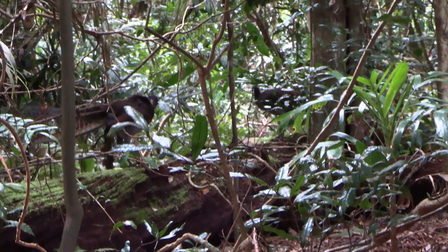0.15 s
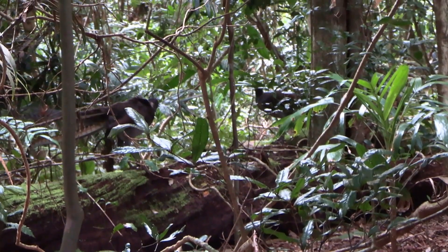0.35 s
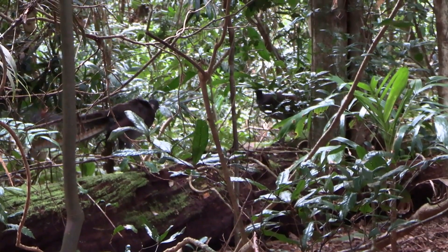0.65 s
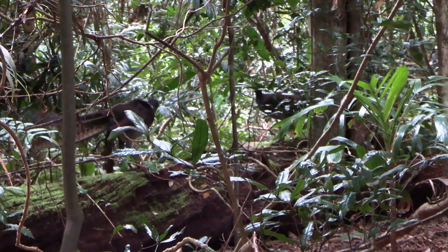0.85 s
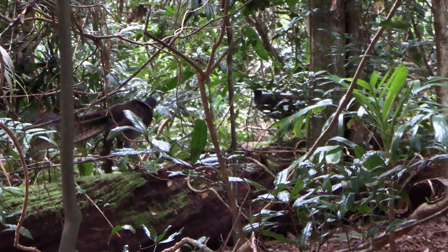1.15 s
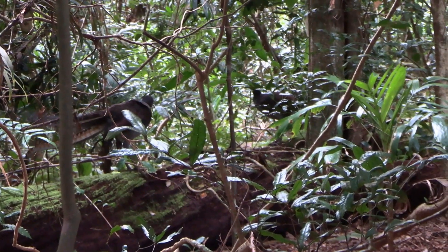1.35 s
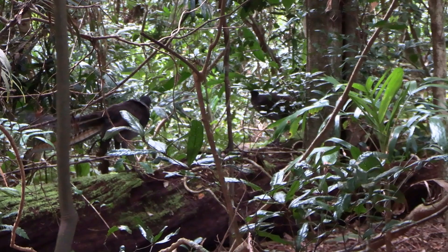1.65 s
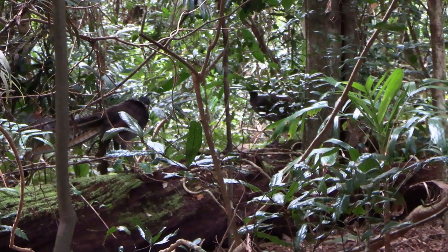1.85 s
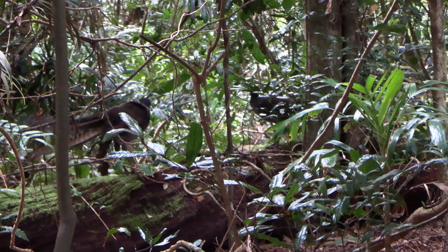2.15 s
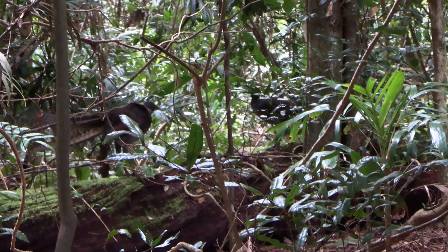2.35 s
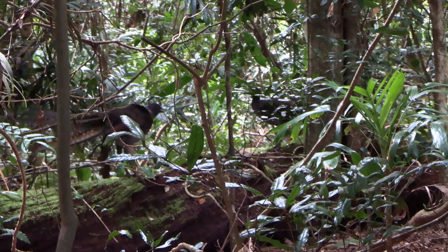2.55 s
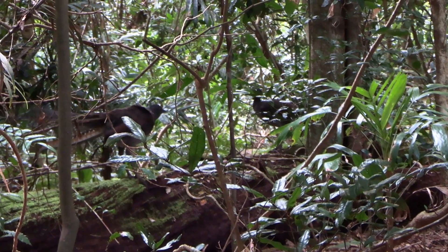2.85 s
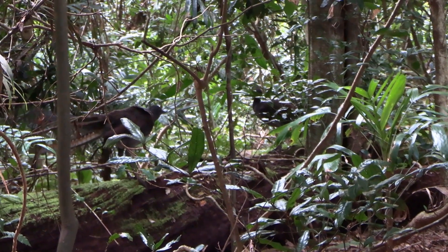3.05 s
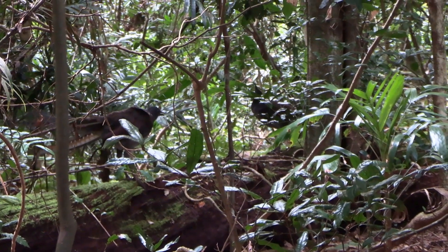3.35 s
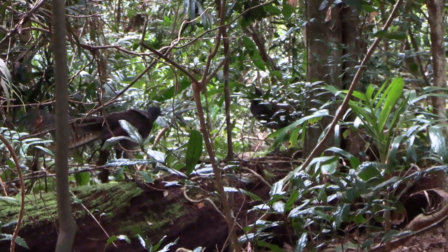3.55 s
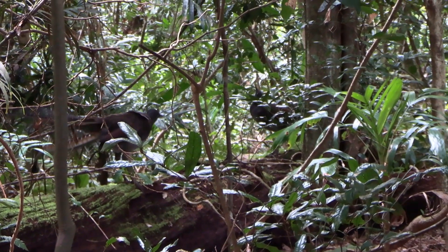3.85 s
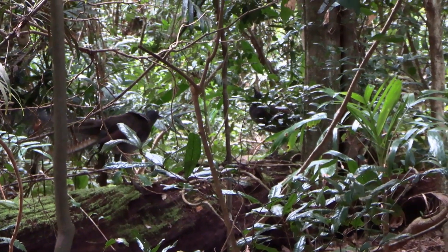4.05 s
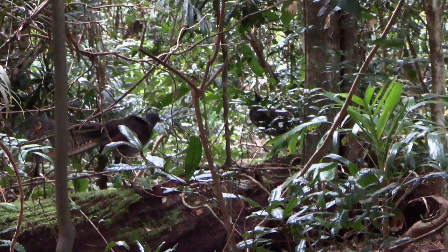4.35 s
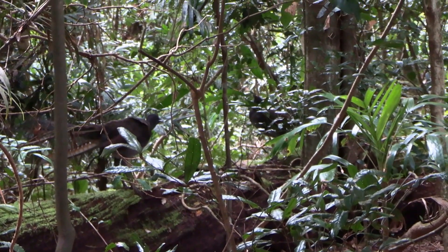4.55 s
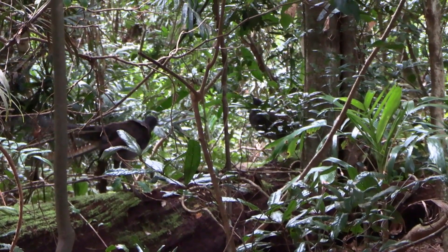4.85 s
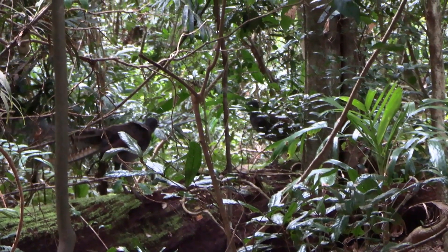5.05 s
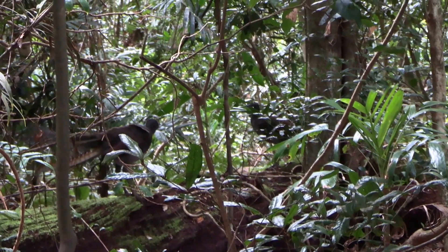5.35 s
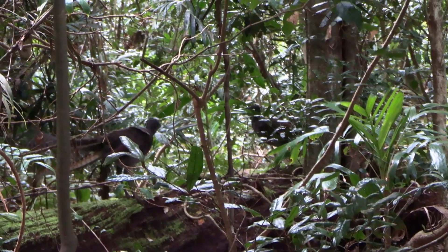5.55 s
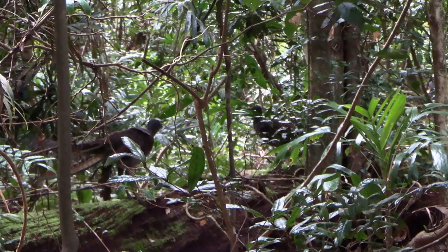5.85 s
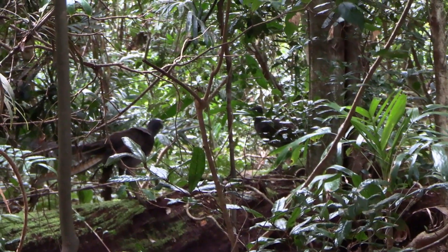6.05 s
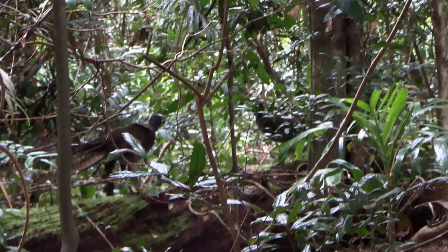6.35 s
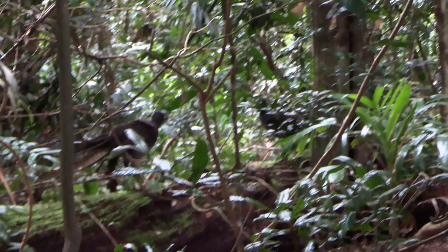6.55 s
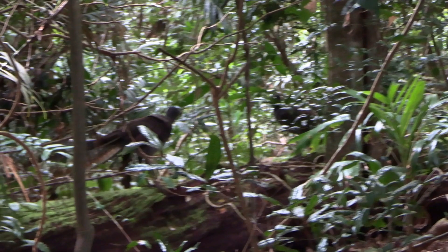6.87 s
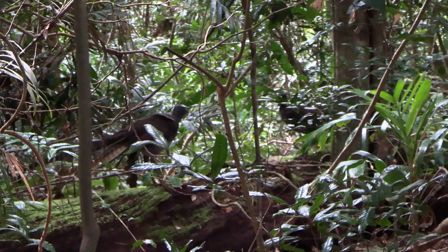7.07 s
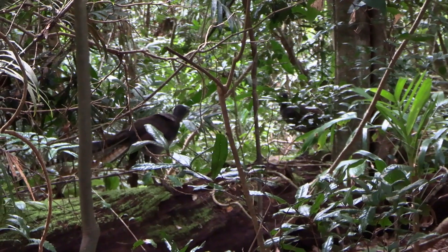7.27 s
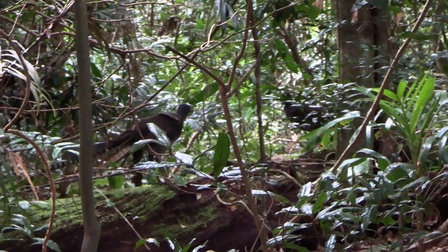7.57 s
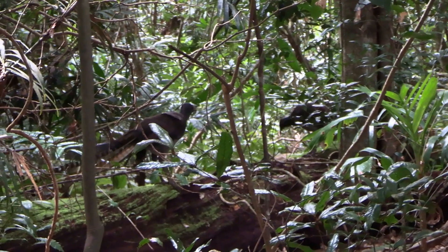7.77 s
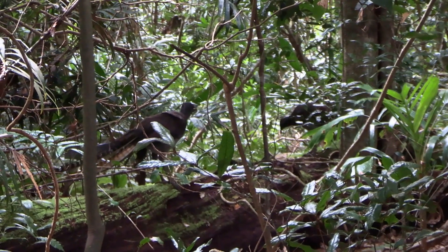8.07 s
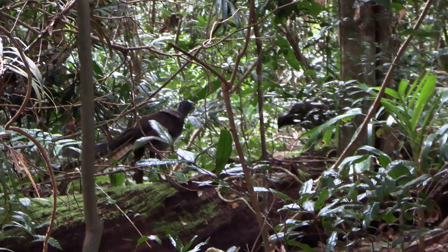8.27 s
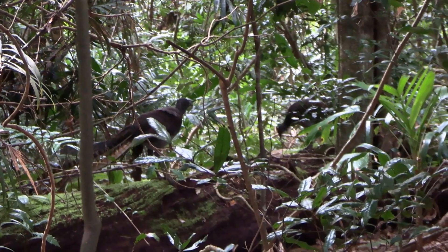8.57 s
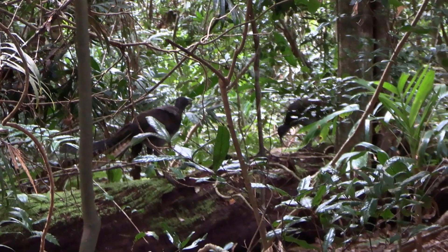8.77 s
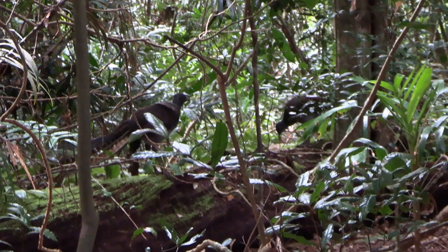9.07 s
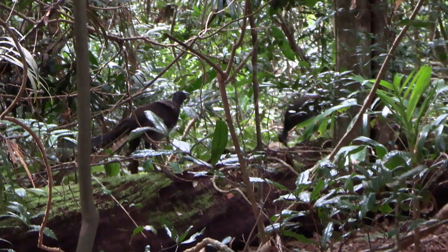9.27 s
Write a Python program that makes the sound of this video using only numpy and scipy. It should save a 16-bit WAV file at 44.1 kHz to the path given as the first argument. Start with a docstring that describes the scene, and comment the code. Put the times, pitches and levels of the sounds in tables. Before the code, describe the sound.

In a rainforest with a steady low rumble and airy hiss, a lyrebird near the microphone delivers three bouts of rhythmic clicks and upward whoops. The long pause after the first holds feather swishes, small leaf crunches and faint thin chirps. The last two bouts come close together, followed by a light shake of plumage. High, bell-like pings from a distant bird ring among the trees.

```python
"""Lyrebird dancing in a rainforest

A lyrebird sings on a log. Each beat is a snap (a very fast downward sweep), a rising whoop from the two
sides of the syrinx, and a short noisy burst with a rustle. Between bouts, friction makes its feathers
swish and dry leaves crunch under its claws. Pings and thin chirps of distant birds sound over a rumble.
Reflection from the log, ground and trunks gives echoes; scattering among the trees gives reverberation."""
import sys
import numpy as np
from scipy import signal
from scipy.fft import rfft, irfft, next_fast_len
from scipy.io import wavfile

SR = 44100
rng = np.random.default_rng(int(sys.argv[2]) if len(sys.argv) > 2 else 0)


def master_out(mix):
    """Clip the mix to full scale and print it as 16-bit PCM to the path in sys.argv[1]."""
    frames = np.transpose(np.atleast_2d(mix))
    ceiling = np.clip(frames, -1, 1)
    pcm = np.round(ceiling * 32767).astype(np.int16)
    wavfile.write(sys.argv[1], SR, pcm)


N = 415422

# Levels in the tables are relative, within each source.
# spectra of the air's hiss and the low rumble: (frequency [Hz], level [dB])
AIR_SPECTRUM = [(100, -3), (170, -2), (210, 0.5), (270, -1), (340, -5.5), (600, -10), (950, -10.5),
                (1500, -16), (2600, -24), (4500, -26), (7500, -32.5), (15000, -36)]
RUMBLE_SPECTRUM = [(12, -2.5), (24, 1), (33, -1.5), (48, -11.5), (62, -13.5), (80, -14.5), (125, -15),
                   (160, -24), (220, -43), (500, -66.5)]
# dull low bumps: (time [s], pitch [Hz], level [dB])
BUMPS = [(5.48, 170, -32.5), (7.679, 63, -22), (9.002, 141, -30)]
# thin chirps: (time [s], start pitch [Hz], end pitch [Hz], level [dB])
CHIRPS = [(3.032, 5230, 6130, -48), (3.279, 6070, 7000, -53), (4.110, 7000, 7500, -58),
          (4.510, 7360, 7350, -47.5)]
# bell-like pings: (time [s], nominal pitch [Hz], level [dB])
PINGS = [(1.138, 3930, -24), (1.488, 3784, -26), (1.801, 3670, -26.5), (2.138, 3643, -26),
         (2.838, 3734, -28.5), (4.540, 3720, -28), (5.278, 3695, -27.5), (5.973, 3684, -28),
         (6.685, 3620, -29.5), (7.455, 3680, -28.5), (8.850, 3617, -28)]
# scratches in dry leaves: (time [s], level [dB], decay time [s])
SCRATCHES = [(2.52, -38.5, 0.0088), (2.579, -30, 0.01), (2.626, -45, 0.087), (2.689, -37, 0.011),
             (2.758, -46, 0.016), (3.396, -41.5, 0.02), (3.42, -36.5, .015), (3.463, -38, 0.026),
             (3.56, -43, 0.0067), (3.65, -41.5, 0.0079)]
# single feather swishes: (time [s], duration [s], level [dB])
SWISHES = [(1.234, 0.021, -28), (1.325, 0.034, -32), (1.451, 0.047, -32), (1.628, 0.041, -36.5),
           (1.911, 0.044, -34), (2.095, 0.046, -38.5), (3.458, 0.02, -44), (3.55, 0.029, -41.5),
           (3.793, 0.011, -43.5), (3.886, 0.013, -49.5), (4.185, 0.022, -50), (4.223, 0.021, -45),
           (6.452, 0.011, -35), (6.584, 0.042, -39), (8.551, 0.018, -33.5), (8.7, 0.016, -34.5),
           (8.757, 0.022, -42.5), (8.822, 0.01, -33.5)]
# spectra of leaves, swishes, the burst after a whoop, the hiss after a snap: (frequency [Hz], level [dB])
LEAF_SPECTRUM = [(400, -30), (1000, -4.5), (2400, -3.5), (4500, -10), (6200, -14.5), (8000, -28.5),
                 (15000, -45)]
SWISH_SPECTRUM = [(400, -25.5), (900, 3), (1600, 3), (2700, 5.5), (4300, 4.5), (5700, -0.5), (6500, -12.5),
                  (7000, -11), (8400, -13.5), (9100, -19.5), (9700, -20), (10400, -20.5), (15000, -42)]
BURST_SPECTRUM = [(300, -24.5), (600, -10), (900, 2), (1700, 1), (2500, 5.5), (3300, 0), (4300, -19.5),
                  (5600, -37), (6600, -24), (15000, -46)]
RASP_SPECTRUM = [(1500, -11), (2600, 7), (3400, -5), (4500, -2.5), (5800, -3.5), (6500, -10.5),
                 (7000, -10.5), (8400, -21.5), (9100, -18.5), (9700, -19.5), (10500, -29), (15000, -31)]
# partials of the squawk: (harmonic number, level [dB])
SQUAWK_HARMONICS = [(1, -12), (2, -1.5), (3, -11), (4, -2.5)]
# squeaks that brighten some snaps: (time [s], pitch [Hz], level [dB])
SQUEAKS = [(.419, 4420, -21.5), (.643, 4370, -26), (1.088, 4400, -26), (5.84, 4500, -26), (7.93, 4580, -32),
           (8.155, 4400, -27)]
# beats of the song: (time [s], snap level [dB], whoop duration [s], effort [dB])
BEATS = [(-.025, -11, .12, -1.5), (0.191, -5.5, .13, -1), (.418, -5, .13, -1), (0.643, -4.5, 0.12, 0),
         (0.864, -3.5, .12, 0), (1.082, -5.5, .107, 0), (4.696, -28, 0.14, -1), (4.935, -6.5, .13, -1),
         (5.159, -3, .13, 1.5), (5.391, -4.5, 0.12, 1), (5.614, -3.5, 0.12, 1), (5.836, -3.5, .12, 0),
         (6.052, -8, .12, 1.5), (6.274, -3, 0.11, 0), (6.791, -23, .139, 0), (7.028, -6, 0.12, 0.5),
         (7.251, -6.5, .13, -.5), (7.473, -6.5, .13, 0.5), (7.7, -5.5, .13, .5), (7.928, -5, 0.12, .5),
         (8.153, -3.5, 0.13, 0), (8.382, -4.5, 0.11, 0)]
# filters for the snap and for the whoop's overtones: (frequency [Hz], gain [dB])
SNAP_RESPONSE = [(400, -11), (900, -5), (1400, 7.5), (2600, -5), (3400, -8), (4700, -1.5), (6200, -48),
                 (8000, -5), (15000, -14)]
THROAT_RESPONSE = [(3000, 3), (4700, -31), (5900, -5), (6700, -7), (8100, -17), (9300, -34), (11500, -30),
                   (15000, -47)]
# small leaves and stems reflect treble better than bass: (frequency [Hz], gain [dB])
FOLIAGE_RESPONSE = [(600, 0.5), (1000, -3.5), (1600, -1), (3000, -1.5), (4500, 5), (12000, 1.5)]
# echoes off the log, the ground and near trunks: (delay [s], gain [ratio])
ECHOES = [(.0011, 0.15), (.0032, 0.11), (.0078, 0.17), (.0089, 0.13), (0.019, 0.14)]
SQUAWK_START_S = 1.1915


def undb(db):
    """Amplitude ratio of a level in decibels."""
    return 10 ** (np.asarray(db) / 20)


def unit(x):
    """Normalisation to an rms of 1."""
    return x / np.sqrt(np.mean(x ** 2))


def clock(length):
    """Uniform sample times over a duration in seconds."""
    return np.arange(max(int(length * SR), 8)) / SR


def add(track, start, sound):
    """Superposition: a sound adds to the track from its start time on."""
    i = int(start * SR)
    lo, hi = max(i, 0), min(i + len(sound), N)
    if hi > lo:
        track[lo:hi] += sound[lo - i:hi - i]


def tone(hz):
    """A sinusoid whose phase is the integral of its frequency."""
    return np.sin(2 * np.pi * np.cumsum(hz) / SR)


def gate(t, length, rise, fall):
    """A trapezoidal envelope, with rise and fall times in seconds."""
    return np.clip(t / rise, 0, 1) * np.clip((length - t) / fall, 0, 1)


def wander(rate, size):
    """Random modulation: interpolated noise, rate values a second, with a spread near 1."""
    steps = np.arange(size) / SR * rate
    return 1.194 * np.interp(steps, np.arange(4096), rng.standard_normal(4096))


def colour(x, points):
    """Minimum-phase filtering: folding the cepstrum makes a (frequency [Hz], gain [dB]) curve causal."""
    hz, db = np.transpose(points)
    size = next_fast_len(N + SR // 4, True) // 2 * 2
    bin_hz = np.maximum(np.fft.rfftfreq(size, 1 / SR), 1)
    magnitude = undb(np.interp(np.log(bin_hz), np.log(hz), db))
    cepstrum = irfft(np.log(magnitude))
    cepstrum[1:size // 2] *= 2
    cepstrum[size // 2 + 1:] = 0
    return irfft(np.exp(rfft(cepstrum)) * rfft(x, size))[:N]


def friction(spectrum, grain_db):
    """Friction noise: dense tiny ticks of uneven size, at an rms of 1."""
    ticks = rng.standard_normal(N) * undb(grain_db * wander(400, N))
    return unit(colour(ticks, spectrum))


def trees(x, t60, treble_t60, build):
    """Reverberation: sound scattered by trunks and foliage builds up, then decays exponentially."""
    t = clock(1.5)
    noise = rng.standard_normal(len(t))
    low = signal.sosfiltfilt(signal.butter(2, 5000, fs=SR, output="sos"), noise)
    tail = low * 1000 ** (-t / t60) + (noise - low) * 1000 ** (-t / treble_t60)
    tail *= 1 - np.exp(-t / build)
    return signal.fftconvolve(x, tail / np.linalg.norm(tail))[:N]


def forest():
    """Ambient noise: a hiss of air, a rumble and a hum, each under slow random modulation."""
    air = unit(colour(rng.standard_normal(N), AIR_SPECTRUM)) * undb(-46.5 + 0.43 * wander(3.01, N))
    rumble_db = -28.5 + 1.2 * wander(5, N)
    rumble = unit(colour(rng.standard_normal(N), RUMBLE_SPECTRUM)) * undb(rumble_db)
    hum = tone(113 + 5 * wander(14, N)) * undb(-43.5 + 0.73 * wander(12, N))
    return air + rumble + hum


def bumps():
    """Low tone bursts, whose smooth envelope makes them soft thumps."""
    out, t = np.zeros(N), clock(0.066)
    for start, hz, db in BUMPS:
        add(out, start, undb(db) * tone(hz * (1 + 0.11 * wander(45, len(t)))) * np.hanning(len(t)))
    return out


def chirps():
    """A small bird's thin notes are linear frequency glides with a faint reverberant tail."""
    out, t = np.zeros(N), clock(0.029)
    for start, from_hz, to_hz, db in CHIRPS:
        hz = np.linspace(from_hz, to_hz, len(t)) * (1 + 0.013 * wander(600, len(t)))
        add(out, start, undb(db) * tone(hz) * gate(t, t[-1], .01, 0.0058))
    return out + undb(-5) * trees(out, t60=0.35, treble_t60=0.25, build=.006)


def pings():
    """Frequency modulation: a distant bird's pure lead-in steps up to a fast trill, which reverberates."""
    lead_s, step_s, lead_ratio, trill_hz, trill_depth = .019, 0.0176, .92, 125.7, 0.047
    peak_s, rise_db_per_s, fall_db_per_s = 0.036, 203, 115
    out, t = np.zeros(N), clock(0.066)
    step = np.clip((t - lead_s) / step_s, 0, 1)
    swell_db = 3 + np.minimum(rise_db_per_s * (t - peak_s), fall_db_per_s * (peak_s - t))
    for start, hz, db in PINGS:
        trill = trill_depth * tone(trill_hz + 25 * wander(85.5, len(t)))
        bend = lead_ratio * (1 - step) + step * (.99 + trill)
        add(out, start, undb(db + swell_db) * tone(hz * bend) * gate(t, t[-1], 0.0044, 0.012))
    return undb(-2.5) * out + trees(out, t60=1.0, treble_t60=0.63, build=0.0027)


def litter():
    """Fracture and friction: claws crack a dry leaf, then the crunch decays exponentially."""
    envelope, t = np.zeros(N), clock(0.23)
    crack = .8 * np.exp(-t / .003)
    for start, db, decay in SCRATCHES:
        add(envelope, start + .001, undb(db) * (crack + np.exp(-t / decay)) * gate(t, .2, .0015, .05))
    return envelope * friction(LEAF_SPECTRUM, grain_db=2.5)


def twigs(break_above_db=-38):
    """Damped vibration: a twig gives way under each hard scratch and rings briefly."""
    out, t = np.zeros(N), clock(.06)
    envelope = np.exp(-t / 0.0064) * gate(t, t[-1], 0.0019, .01)
    for start, db, _ in SCRATCHES:
        if db > break_above_db:
            hz = 2370 + 400 * wander(1530, len(t))
            add(out, start + 0.00194, undb(db + 6.5) * tone(hz) * envelope)
    return out


def shake(count, first_period_s=0.0678, slowing_s=0.0043, growth_db_per_s=14):
    """A slowing, growing oscillation of the plumage, as strokes: (time [s], duration [s], level [dB])."""
    k = np.arange(count)
    offsets = k * first_period_s + k * (k - 1) / 2 * slowing_s
    return [(8.877 + offset, 0.046, -45.5 + growth_db_per_s * offset) for offset in offsets]


def feathers():
    """Sliding friction: plumes brush past each other in short swells, ending with a shake."""
    envelope = np.zeros(N)
    for start, length, db in SWISHES + shake(count=7):
        add(envelope, start, undb(db) * gate(clock(length), length, length * 0.41, length * 0.48))
    return envelope * friction(SWISH_SPECTRUM, grain_db=1.5)


def closing_bursts(second_after_s=0.052):
    """Damped noise: a short burst ends the whoop, followed by a rustle and a briefer second burst."""
    bursts, rustle, t = np.zeros(N), np.zeros(N), clock(0.094)
    first_burst = gate(t, 0.13, 0.011, 0.0092) * np.exp(-t / 0.025)
    second_burst = gate(t, .12, 0.0039, .03) * np.exp(-t / 0.0062)
    for start, _, length, effort_db in BEATS:
        end, db = start + length, effort_db - 24
        if abs(end - SQUAWK_START_S) < length:
            continue  # the squawk ends this whoop instead
        add(bursts, end - .002, undb(db) * first_burst)
        add(bursts, end + second_after_s, undb(db) * second_burst)
        add(rustle, end, undb(db - 12) * gate(t, 0.15, 0.0093, 0.14))
    dull_noise = bursts * friction(BURST_SPECTRUM, grain_db=0)
    return dull_noise + rustle * friction(SWISH_SPECTRUM, grain_db=-3.5)


def rasp():
    """A hiss follows each snap and decays exponentially under the whoop."""
    envelope, t = np.zeros(N), clock(0.45)
    for start, *_ in BEATS:
        add(envelope, start, (1 - np.exp(-t / 0.0024)) * np.exp(-t / 0.037))
    return undb(-30) * envelope * friction(RASP_SPECTRUM, grain_db=6.5)


def squeaks():
    """Fast random frequency modulation roughens a high, quickly damped note."""
    out, t = np.zeros(N), clock(0.021)
    envelope = np.exp(-t / 0.014) * gate(t, t[-1], 0.00083, .012)
    for start, hz, db in SQUEAKS:
        jitter = 1 + .07 * wander(1200, len(t))
        add(out, start, undb(db) * tone(hz * jitter) * envelope)
    return out


def squawk(from_hz=1350, to_hz=618):
    """A harsh harmonic series closes the first bout: it starts with a crack and drops about an octave."""
    out, t = np.zeros(N), clock(.032)
    glide_hz = to_hz + (from_hz - to_hz) * np.exp(-t / 0.0091)
    hz = glide_hz * (1 + 0.039 * wander(900, len(t)))
    voice = sum(undb(db) * tone(k * hz) for k, db in SQUAWK_HARMONICS)
    crack = 1 + 2 * np.exp(-t / 0.0014)
    add(out, SQUAWK_START_S, undb(-25.5) * voice * crack * gate(t, t[-1], .0006, 0.0067))
    return out


def beats(pause_s=.35):
    """The rhythm of the song: each beat, and whether it is the first after a pause."""
    starts = [row[0] for row in BEATS]
    gaps = np.diff(starts, prepend=starts[0])
    return [(*row, gap > pause_s) for row, gap in zip(BEATS, gaps)]


def snaps():
    """A very fast downward sweep is heard as an impulse; the first after a pause is slower."""
    out, to_hz = np.zeros(N), 1264
    for start, db, _, _, first in beats():
        from_hz, length = (3230, 0.0077) if first else (5170, 0.00098)
        t = clock(length)
        detune = np.exp(0.051 * rng.standard_normal())
        hz = from_hz * (to_hz / from_hz) ** (t / length) * detune
        add(out, start - .0006, undb(db) * tone(hz) * gate(t, length, length / 6, length / 2))
    return 1.05 * colour(out, SNAP_RESPONSE)


def low_voice(t, length, bend, detune):
    """Exponential growth: one side of the syrinx idles on a pure tone, then swells and shoots upward."""
    base_hz, rise_hz, idle_db, swell_db_per_s = 685, 1239, -21.5, 176
    onset = np.clip((t - 0.36 * length) / 0.02, 0, 1)
    swell = np.maximum(undb(idle_db), onset * undb(swell_db_per_s * (t - length)))
    sweep = np.exp((t / length - 1) / (.16 + .013 * bend))
    hz = (base_hz + rise_hz * sweep) * (1 + 0.0098 * detune + 0.012 * wander(299.6, len(t)))
    waver_db = 1.5 * wander(121, len(t))
    return undb(-21.5 + waver_db) * swell * gate(t, t[-1], 0.02, 0.013) * tone(hz)


def high_voice(t, length, held_hz, pull_hz=1880, pull_s=0.026):
    """Random modulation roughens the other side of the syrinx; returns its fundamental and overtones."""
    flutter = 1 + .032 * wander(1300, len(t))
    pull = np.clip(1 + (t - length) / pull_s, 0, 1.2) ** 0.83  # a last rise with the low voice
    hz = held_hz * .97 * flutter + pull_hz * pull
    accent_db = 8 * np.exp(-((t - 0.015) / 0.009) ** 2)
    fundamental = undb(-37 + accent_db) * gate(t, t[-1], 0.0072, 0.019) * tone(hz)
    puffs = undb(-34.5 + 4.5 * wander(650, len(t)))
    overtones = sum(tone(k * held_hz * flutter) for k in range(2, 6))
    return fundamental, puffs * overtones * gate(t, length, 0.016, 0.034)


def whoops():
    """Biphonation: the two sides of the syrinx sing at once, and the throat filters the overtones."""
    out, buzz = np.zeros(N), np.zeros(N)
    for start, _, length, effort_db, first in beats():
        t = clock(length + 0.0055)
        bend, high_detune, low_detune = rng.standard_normal(3)  # no two whoops are alike
        add(out, start, undb(effort_db) * low_voice(t, length, bend, low_detune))
        arch_hz = 2515 + 312.3 * np.sin(2.1 * t / length)
        held_hz = arch_hz * (1 + .015 * high_detune + .014 * wander(90, len(t)))
        # a soft tone about an octave under the high voice opens the whoop
        opening = gate(t - 0.013, 0.034, .01, .01) * tone(held_hz / 2)
        add(out, start, undb(effort_db - 32) * opening)
        fundamental, overtones = high_voice(t, length, held_hz)
        high_gain = undb(effort_db - 6.5 * first)  # weaker after a pause
        add(out, start, high_gain * fundamental)
        add(buzz, start, high_gain * overtones)
    return out + colour(buzz, THROAT_RESPONSE)


def scene():
    """The near lyrebird's direct sound, early echoes and reverberation add to the forest and far birds."""
    song = snaps() + squeaks() + whoops() + squawk()
    rustle = rasp() + closing_bursts() + feathers() + litter() + twigs()
    reflected_song, reflected_rustle = colour(song, FOLIAGE_RESPONSE), colour(rustle, FOLIAGE_RESPONSE)
    reflected = reflected_song + reflected_rustle
    near = song + rustle
    for delay, gain in ECHOES:
        add(near, delay, gain * reflected)
    # directivity: the song is beamed from the beak, so less of it scatters in the nearby plants
    spilled = reflected_rustle + undb(-4) * reflected_song
    undergrowth = undb(-1) * trees(spilled, t60=.14, treble_t60=.15, build=.005)
    canopy = undb(-10) * trees(reflected, t60=0.9, treble_t60=0.7, build=0.021)
    return (near + undergrowth + canopy + pings() + chirps() + forest() + bumps())[None]


def record(dry, cutoff_hz=15800):
    """Band limiting: a steep low-pass filter removes the highest treble."""
    return signal.sosfilt(signal.ellip(10, .2, 70, cutoff_hz, fs=SR, output="sos"), dry)


dry = scene()
out = record(dry)
master_out(out)
```